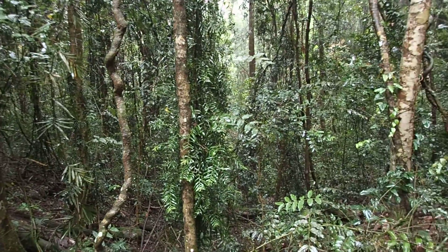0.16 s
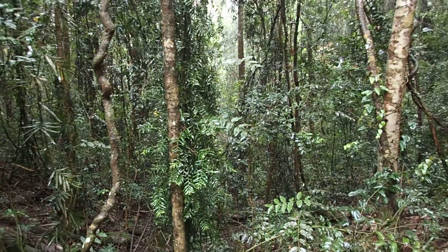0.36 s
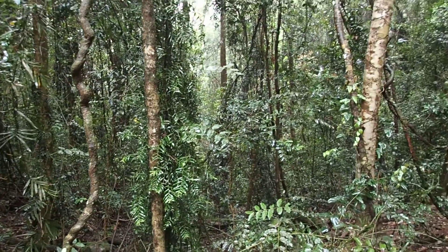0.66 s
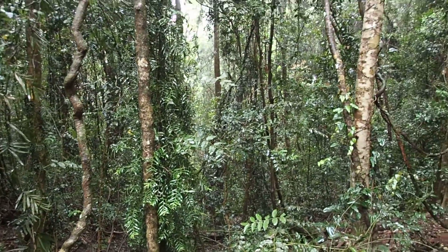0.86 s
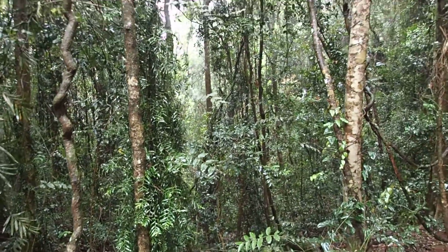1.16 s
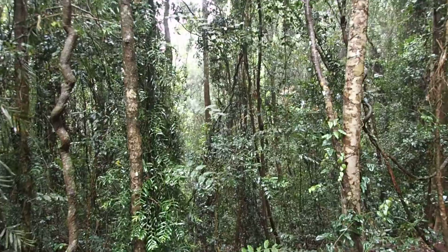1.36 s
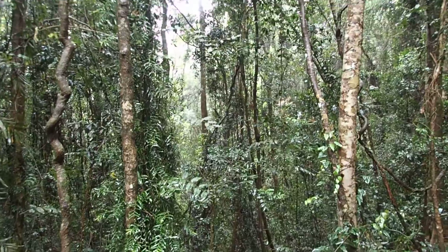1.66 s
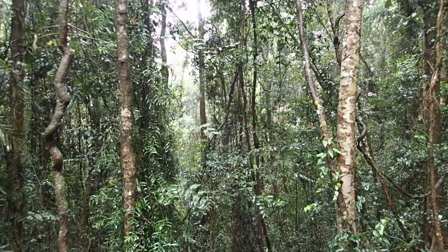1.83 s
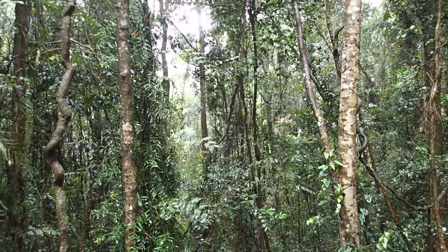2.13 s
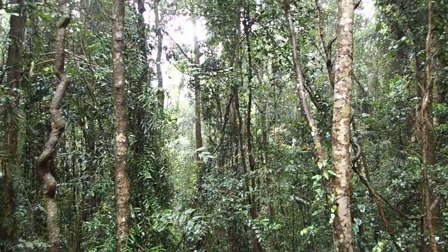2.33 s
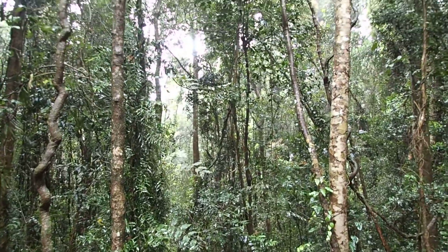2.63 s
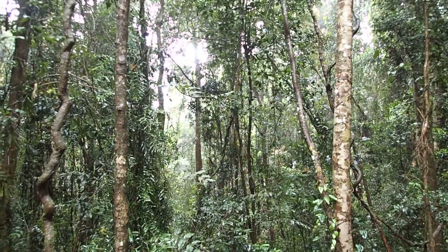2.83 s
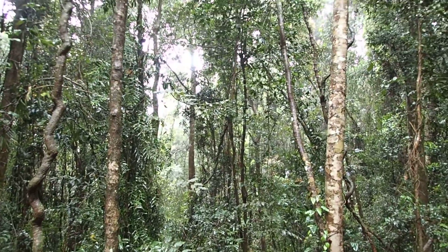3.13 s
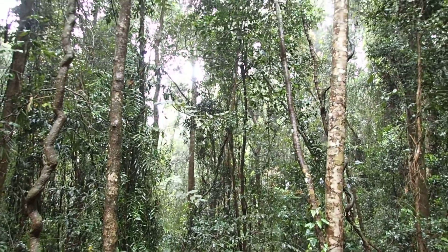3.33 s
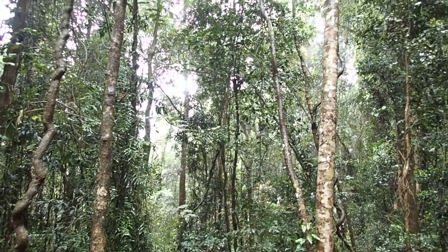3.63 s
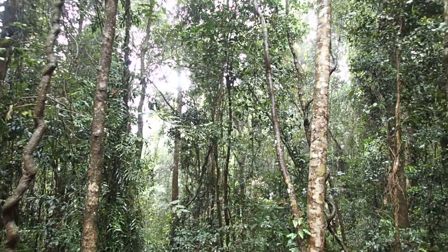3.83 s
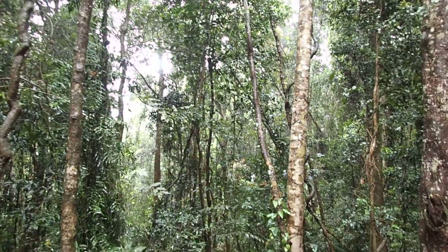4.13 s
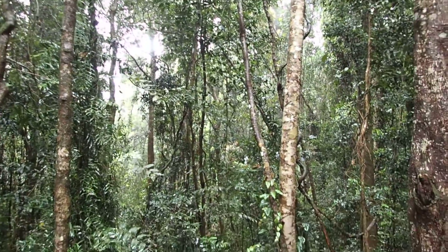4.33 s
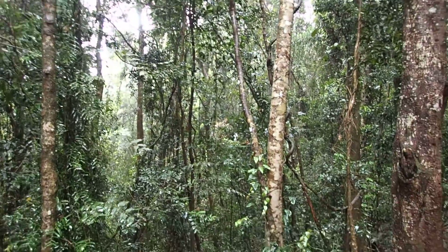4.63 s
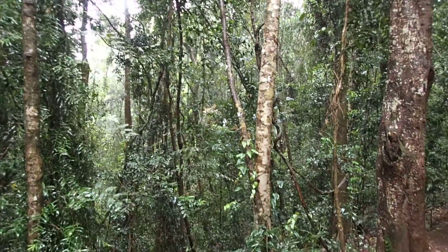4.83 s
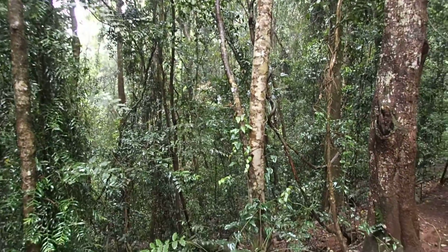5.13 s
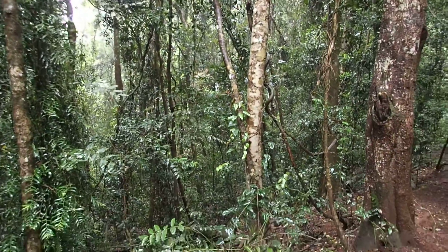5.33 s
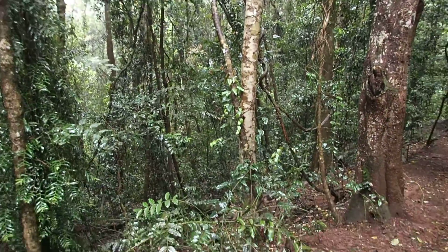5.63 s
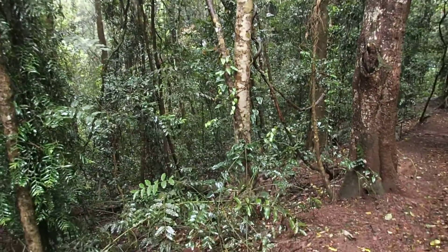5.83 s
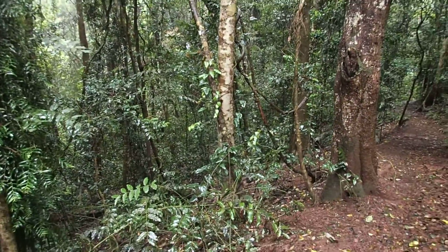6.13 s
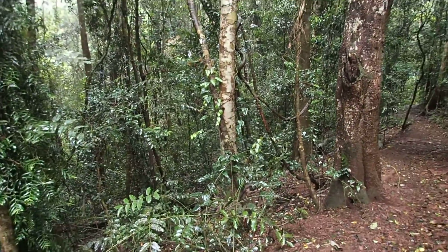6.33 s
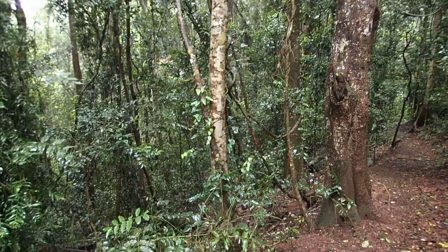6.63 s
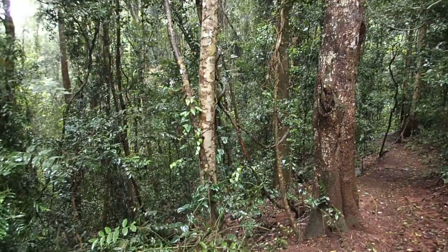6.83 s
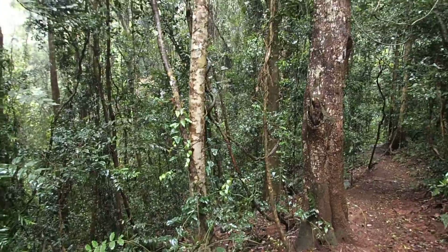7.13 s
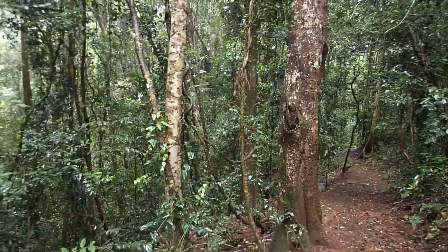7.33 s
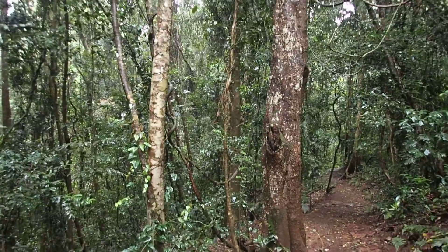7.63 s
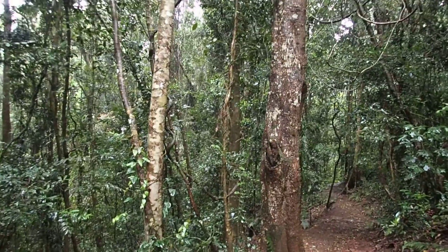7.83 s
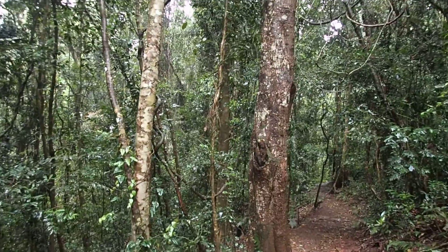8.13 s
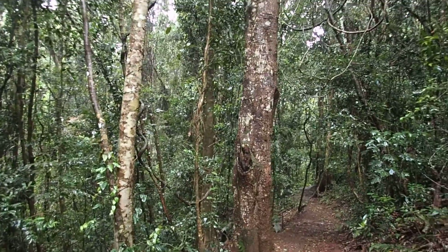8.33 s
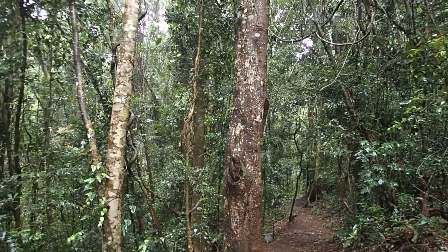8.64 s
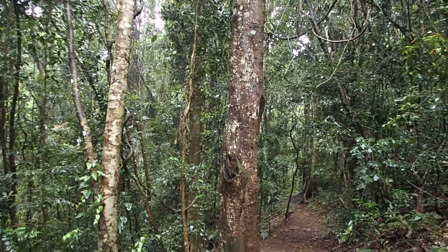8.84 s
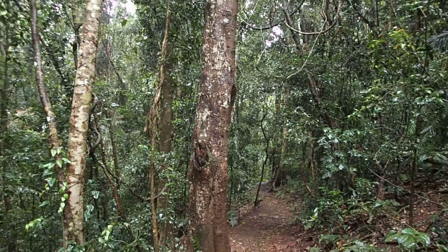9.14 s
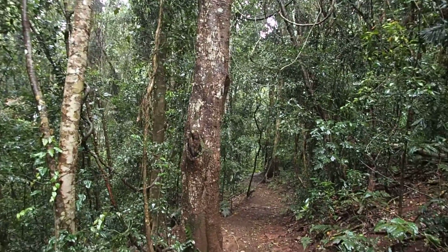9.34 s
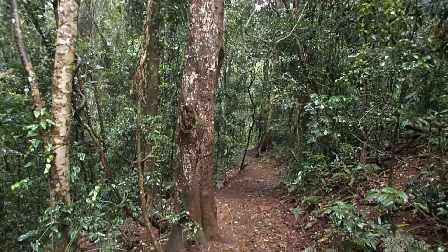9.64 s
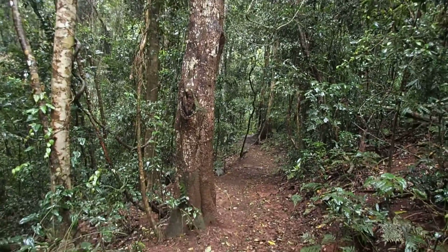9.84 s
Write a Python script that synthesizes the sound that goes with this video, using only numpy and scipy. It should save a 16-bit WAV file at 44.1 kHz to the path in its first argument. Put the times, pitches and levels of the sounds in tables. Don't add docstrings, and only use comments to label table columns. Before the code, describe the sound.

In a dripping rainforest a bird twice warbles into a held whistle and cracks like a whip, while another bird shrills far off between.

```python
import sys
import numpy as np
from scipy import signal
from scipy.fft import rfft, irfft, next_fast_len
from scipy.io import wavfile
from scipy.ndimage import uniform_filter1d

SR = 44100
rng = np.random.default_rng(int(sys.argv[2]) if len(sys.argv) > 2 else 0)


def store_wav(level_fs):
    pcm = np.round(np.clip(np.atleast_2d(level_fs), -1, 1) * 32767)
    wavfile.write(sys.argv[1], SR, pcm.T.astype(np.int16))


def field_ratio(decibels):
    return 10 ** (np.asarray(decibels, dtype=float) / 20)


N = 439677

# frequency in Hz, density in dB, likeness of left and right 0-1.
AIR_SPECTRUM = [(20, -8.5, 1), (46.4, -0.5, 0.7), (149, 0.5, 0.58), (300, -2.5, 0.52), (350, -4, 0.41),
                (1600, -9.5, 0.62), (2300, -15.5, 0.92), (4350, -15, 0.88), (5890, -10, 0.55),
                (9160, -18.5, 0.08), (15200, -22.5, 0)]
AIR_DB = -53.5

# start in seconds, peak in dB, ring in Hz,
# left minus right in dB, splash in Hz.
THUDS = [(0.174, -42, 503, -1, 1670), (0.664, -48, 690, 2, 1010), (0.782, -56, 544, 0.5, 1240),
         (1.775, -35, 630, 4, 1020), (3.967, -35, 686, 0, 1390), (4.008, -48, 790, 7, 2940),
         (4.191, -44.5, 1010, 10, 2970), (4.201, -44, 653, -5, 1505), (4.456, -40, 900, 9, 3540),
         (4.831, -52, 420, 1.5, 1374), (4.948, -36, 587, 2.0, 1260), (6.274, -59, 431, -5, 1400),
         (6.316, -47, 650, 1, 1660), (6.326, -44, 506, 4, 1040), (6.46, -53, 427, -4, 3120),
         (6.81, -34, 700, 1, 1140), (6.973, -34, 770, 1, 2095), (7.734, -57, 799, -4, 1220),
         (8.067, -39, 834, 4, 2140), (9.499, -49, 770, 8, 1110)]
# start in seconds, peak in dB, pitch in Hz, left minus right in dB.
TICKS = [(0.282, -40, 8100, 4.5), (0.3242, -39, 6390, 2.0), (0.5481, -42, 7200, 2.5), (1.41, -41, 6600, 6),
         (2.0443, -39, 7350, 1.5), (2.8403, -40, 6400, 2.0), (4.0096, -30.5, 7800, 6),
         (4.1923, -34, 7350, 1.5), (4.4841, -29, 7100, 1.5), (5.0175, -44, 7750, 1.5),
         (5.9853, -39, 7240, 14), (7.1071, -40, 8300, 0), (7.2633, -48, 6345, -1), (7.4435, -42, 8060, 7),
         (7.8365, -74, 8160, -29), (7.9956, -48, 8230, -20), (8.4255, -43, 7860, 2.0)]
# start in seconds, peak in dB, pitch in Hz, left minus right in dB.
ODD_DROPS = [
    (5.3028, -33, 15000, 15),
    (5.86, -38, 360, 1),
    (3.37, -42, 680, 1),
    (0.77, -39, 5500, 4),
    (6.4, -42, 3900, 1.5),
    (6.3165, -37, 2830, 2),
    (5.9, -38, 3130, -2),
]
EVEN_SPLASH_DB, SPLASH_DB_PER_DB = -41.5, 0.77

# start in seconds, fall level in dB, rise level in dB.
SONG = [(2.84, -71, -52.5), (3.047, -46, -47.5), (3.265, -44.5, -46.5), (3.483, -44, -43.5),
        (3.70, -44, -50), (3.922, -44, -46), (4.143, -44.5, -48.5), (4.368, -44.5, -47.5), (4.6, -44, -48),
        (4.834, -42.5, -50), (5.059, -43.5, -47.5), (5.297, -44, -47), (5.535, -45, -48), (5.765, -43, -47),
        (5.995, -45.5, -47.5), (6.223, -46, -48.5), (6.46, -46.5, -48.5), (6.693, -45, -50),
        (6.926, -45, -49.5), (7.165, -45.5, -51.5)]
# time in seconds, share of the way from start to end pitch, level in dB.
FALL = [(-.014, 0, -17.5), (0, 0.25, -13.5), (0.007, 0.454, -8), (0.026, 0.743, -5.5), (.045, .95, -9.5),
        (0.054, 1.012, -16)]
# time in seconds, share of the way from start to end pitch, level in dB.
RISE = [(-.008, 0.16, -11.5), (.008, .42, -5), (.02, .8, 0), (.034, 1, -1.5), (.07, 0.91, -11)]
FALL_FROM_HZ, RISE_FROM_HZ = 7600, 4820
TIRES_S, RISE_AFTER_S, BOTTOM_HZ, TOP_NOTE_HZ = 1.5, (.111, .141), (4946, 4500), (6050, 5647)
PITCH_SCATTER = 0.0066
FAR_LEVEL_DB = -10.5
# time in seconds, pitch in Hz, level in dB.
STRAY_NOTE = [(5.2, 2960, -75), (5.23, 3280, -75), (5.27, 3490, -75)]

# start in seconds, level in dB, width of slur (1 = full).
WARBLES = [(2.537, -60, 0.86), (2.642, -53, 1.05), (2.739, -51.5, 1), (2.835, -50, 1.05),
           (2.935, -49.5, 0.77), (7.8, -63, 0.5), (7.982, -60, 0.8), (8.078, -51.5, 0.62),
           (8.173, -48, 0.36), (8.267, -45.5, 0.06), (8.344, -44, 0)]
SLUR_S, SLUR_HZ, SLUR_UNDER_HZ, SLUR_LIFT_HZ, SLUR_OVER_HZ = 0.0543, 2320, 170, 90, 300
# start in seconds, length in seconds, first pitch in Hz,
# last pitch in Hz, level in dB.
HELD = [
    (3.035, 0.029, 2280, 2302, -48),
    (3.091, 0.054, 2310, 2340, -53),
    (3.164, 0.068, 2300, 2290, -45),
    (3.245, .07, 2298, 2280, -56.5),
    (8.44, 0.034, 2320, 2305, -44),
    (8.494, 0.027, 2300, 2330, -45.5),
    (8.528, 0.047, 2285, 2191, -41),
    (8.577, .03, 2220, 2240, -53),
    (8.607, 0.049, 2310, 2190, -53),
]
SWELL_PEAK, SWELL_START_DB, SWELL_END_DB = 0.61, -7.5, -5.5
# start in seconds, length in seconds, settled pitch in Hz,
# sag in Hz per second, level in dB.
DIPS = [
    (3.316, 0.162, 1540, 424, -48),
    (8.672, .15, 1550, 29.8, -47),
]
DIP_FROM_HZ, DIP_SETTLE_S, DIP_GLIDE_DB, DIP_FULL_S = 2020, .022, -5, 0.1
# time from its start in seconds, pitch in Hz, level in dB.
WHIP = [
    (0, 1778, -50),
    (0.021, 1778, -52),
    (.032, 2087, -46),
    (.052, 3057, -41),
    (0.073, 4270, -42),
    (.093, 6000, -36.5),
    (.105, 7000, -35.5),
    (.115, 7230, -49),
    (.131, 7380, -37),
]
# start in seconds, time stretch, level in dB, pitch of the foot in Hz.
CRACKS = [
    (3.56, 1.0, 4, 1775),
    (8.903, 1.003, 2.5, 1722),
]
WHIP_OVERTONES_DB, WHISTLE_OVERTONES_DB = (-34, -30), (-33,)
THIRD_FADES_HZ = 4400
DIP_ECHO_DB, LOW_ECHO_DB = -7, -16

# frequency in Hz, width in Hz, gain in dB.
BODY = [(1884, 83, -13), (2200, 250, 2), (2640, 430, -6), (3143, 340, 5), (3426, 286, -10.5),
        (3526, 290, 6.5), (4090, 496, -14.5), (4310, 620, 5), (4818, 66, -20), (5082, 1265, 13.5),
        (8020, 1130, 8)]
HISS_DB = -61
NARROW_LOW_HZ, NARROW_HIGH_HZ, NARROW_SIDE_DB = 2140, 4430, -6


def add(out, s, x):
    i = int(s * SR)
    out[..., i:i + x.shape[-1]] += x[..., :max(N - i, 0)]


def walk(rate_hz):
    k = int(SR / rate_hz)
    steps = np.repeat(rng.standard_normal(N // k + 1), k)
    return 1.3 * uniform_filter1d(uniform_filter1d(steps, k), k)[:N]


def panned(x, pan_db):
    return x * field_ratio(np.array([[pan_db], [-pan_db]]) / 2)


def stereo_noise(mid, side, like):
    return np.sqrt(1 + like) * mid + np.sqrt(1 - like) * side * np.array([[1], [-1]])


def air():
    size = next_fast_len(N)
    hz = np.maximum(np.fft.rfftfreq(size, 1 / SR), 1)
    points_hz, db, like = np.transpose(AIR_SPECTRUM)
    db = np.interp(np.log(hz), np.log(points_hz), db)
    like = np.interp(np.log(hz), np.log(points_hz), np.clip(like, 0, 1))
    mid, side = rfft(rng.standard_normal((2, size)))
    spectrum = field_ratio(db) * stereo_noise(mid, side, like)
    out, swell = 0, walk(0.89)
    for octave in range(5, 16, 2):
        share = np.clip(1 - np.abs(np.log2(hz) - octave) / 2, 0, 1)
        band = irfft(spectrum * share, size)[:, :N]
        out = out + band * field_ratio(.4 * swell + .9 * walk(8))
    return out * field_ratio(AIR_DB) / np.sqrt(np.mean(out ** 2))


def strike_leaf(out, s, db, hz, pan_db, cycles, splash_db, splash_s, splash_hz):
    t = np.arange(700) / SR
    ring = np.sin(2 * np.pi * hz * t) * np.exp(-t * hz / cycles) * (1 - np.exp(-t * hz * 3))
    spray = uniform_filter1d(rng.standard_normal(len(t)), size=int(SR / splash_hz))
    spray = spray * np.sqrt(SR / splash_hz)
    splash = spray * np.cos(2 * np.pi * splash_hz * t) * np.exp(-t / splash_s)
    add(out, s, panned(field_ratio(db) * (ring + field_ratio(splash_db) * splash)[None], pan_db))


def drips(patter_count=400):
    out = np.zeros((2, N))
    for s, db, hz, pan_db, splash_hz in THUDS:
        strike_leaf(out, s, db - 4, hz, pan_db, cycles=1.3,
                    splash_db=SPLASH_DB_PER_DB * (EVEN_SPLASH_DB - db), splash_s=0.0059, splash_hz=splash_hz)
    for s, db, hz, pan_db in TICKS + ODD_DROPS:
        strike_leaf(out, s, db, hz, pan_db, cycles=2.7, splash_db=-12.5, splash_s=0.0014, splash_hz=hz)
    for when, faint, pitch, place in rng.random((patter_count, 4)):
        hz = 600 * 18 ** pitch
        strike_leaf(out, when * N / SR, -53 - 12 * faint ** .5, hz, 8 * (place - .5),
                    cycles=3.6, splash_db=3.5, splash_s=0.0026, splash_hz=hz)
    return out


def whistle(out, rows, overtones_db=(), edge_s=0.005):
    s, hz, db = np.transpose(sorted(rows))
    t = np.arange(s[0], s[-1], 1 / SR)
    path_hz = uniform_filter1d(np.interp(t, s, hz), size=200)
    phase = 2 * np.pi * np.cumsum(path_hz) / SR
    tone = np.sin(phase)
    for k, overtone_db in enumerate(overtones_db):
        fade = 1 + k * (path_hz / THIRD_FADES_HZ) ** 10
        tone = tone + field_ratio(overtone_db) * np.sin((k + 2) * phase) / fade
    ends = np.clip(np.minimum(t - s[0], s[-1] - t) / edge_s, 0, 1)
    add(out, s[0], np.sqrt(2) * tone * field_ratio(np.interp(t, s, db)) * np.sin(ends * np.pi / 2) ** 2)


def forest(x, pan_db, wet_db, low_db, cross_hz, t60_low_s, t60_high_s, likeness, early_db, spikes_db,
           turns, build_s):
    t = np.arange(int(1.1 * SR)) / SR
    like = np.clip(likeness, 0, 1)
    low_pass = signal.butter(4, cross_hz, fs=SR, output="sos")
    high_pass = signal.butter(4, cross_hz, "high", fs=SR, output="sos")
    out, facing = np.array([x, x]), turns * walk(5)
    for share in (np.cos(facing), np.sin(facing)):
        mid, side, size = rng.standard_normal((3, len(t)))
        early = 1 + field_ratio(early_db) * np.exp(-t / 0.0079)
        trunks = field_ratio(spikes_db * size) * early * np.clip(t / build_s, 0, 1)
        echoes = trunks * stereo_noise(mid, side, like)
        low = field_ratio(low_db) * signal.sosfilt(low_pass, echoes) * field_ratio(-60 * t / t60_low_s)
        high = signal.sosfilt(high_pass, echoes) * field_ratio(-60 * t / t60_high_s)
        tail = low + high
        response = field_ratio(wet_db) * tail / np.sqrt(np.mean(np.sum(tail ** 2, axis=1)))
        out = out + signal.fftconvolve((share * x)[None], response, axes=1)[:, :N]
    return panned(out, pan_db)


def far_bird():
    voice = np.zeros(N)
    scatters = 1 + PITCH_SCATTER * rng.standard_normal((len(SONG), 2))
    for (start, fall_db, rise_db), scatter in zip(SONG, scatters):
        tired = 1 - np.exp(-(start - SONG[0][0]) / TIRES_S)
        after_s, bottom_hz, top_hz = (fresh + tired * (worn - fresh)
                                      for fresh, worn in (RISE_AFTER_S, BOTTOM_HZ, TOP_NOTE_HZ))
        fall_span_hz = bottom_hz * scatter[0] - FALL_FROM_HZ
        rise_span_hz = top_hz * scatter[1] - RISE_FROM_HZ
        whistle(voice, [(start + s, FALL_FROM_HZ + way * fall_span_hz, db + fall_db + FAR_LEVEL_DB)
                        for s, way, db in FALL])
        whistle(voice, [(start + after_s + s, RISE_FROM_HZ + way * rise_span_hz, db + rise_db + FAR_LEVEL_DB)
                        for s, way, db in RISE])
    whistle(voice, STRAY_NOTE)
    return forest(voice, pan_db=1.0, wet_db=13, low_db=1.5, cross_hz=6000, t60_low_s=1.33, t60_high_s=1.0,
                  likeness=0.84, early_db=5.0, spikes_db=5.5, turns=2.24, build_s=.008)


def warbles(out):
    for s, db, wide in WARBLES:
        low_hz = SLUR_HZ - wide * SLUR_UNDER_HZ
        best_hz = SLUR_HZ + wide * SLUR_LIFT_HZ
        top_hz = SLUR_HZ + np.sqrt(max(wide, 0)) * SLUR_OVER_HZ
        whistle(out, [(s, low_hz, db - 6.5), (s + 0.352 * SLUR_S, best_hz, db),
                      (s + 0.61 * SLUR_S, top_hz, db - 9.5), (s + SLUR_S, SLUR_HZ, db - 19)])


def held_whistle(out):
    for s, length, first_hz, last_hz, db in HELD:
        peak_hz = first_hz + SWELL_PEAK * (last_hz - first_hz)
        whistle(out, [(s, first_hz, db + SWELL_START_DB), (s + SWELL_PEAK * length, peak_hz, db),
                      (s + length, last_hz, db + SWELL_END_DB)], WHISTLE_OVERTONES_DB, edge_s=0.0045)


def low_dips(out):
    for s, length, settled_hz, sag, db in DIPS:
        t = np.linspace(0, length, num=24)
        hz = settled_hz - sag * t + (DIP_FROM_HZ - settled_hz) * np.exp(-t / DIP_SETTLE_S)
        level_db = db + DIP_GLIDE_DB * np.clip(1 - t / DIP_FULL_S, 0, 1)
        whistle(out, zip(s + t, hz, level_db), WHISTLE_OVERTONES_DB, edge_s=0.0071)


def whips(out):
    for start, stretch, whip_db, foot_hz in CRACKS:
        shift_hz = WHIP[0][1] - foot_hz
        whistle(out, [(start + stretch * s, hz - shift_hz * WHIP[0][1] / hz, db + whip_db)
                      for s, hz, db in WHIP], WHIP_OVERTONES_DB)


def whipbird():
    soft, loud, low_notes = np.zeros((3, N))
    warbles(soft)
    held_whistle(soft)
    low_dips(low_notes)
    whips(loud)
    to_trunks = field_ratio(DIP_ECHO_DB)
    direct_dips = panned((1 - to_trunks) * low_notes[None], 1.3)
    sung = forest(soft + to_trunks * low_notes, pan_db=2.0, wet_db=2.5, low_db=LOW_ECHO_DB, cross_hz=1870,
                  t60_low_s=0.86, t60_high_s=1.1, likeness=1.0, early_db=8.5, spikes_db=5, turns=0.35,
                  build_s=0.0069)
    cracked = forest(loud, pan_db=1.0, wet_db=4, low_db=LOW_ECHO_DB, cross_hz=2300,
                     t60_low_s=0.99, t60_high_s=0.83, likeness=0.82, early_db=7.5, spikes_db=8.5, turns=0.67,
                     build_s=0.0028)
    return direct_dips + sung + cracked


def scene():
    return air() + drips() + far_bird() + whipbird()


def causal(db, count):
    cep = irfft(db * np.log(10) / 20)
    half = len(cep) // 2
    cep[1:half] *= 2
    cep[half + 1:] = 0
    return irfft(np.exp(rfft(cep)))[:count]


def microphone(dry):
    hz = np.fft.rfftfreq(8192, 1 / SR)
    colour_db = sum(db / (1 + (2 * (hz - f) / width) ** 2) for f, width, db in BODY)
    tilt_db = 0.32 + 1.85 * np.clip(hz / 4400, 0, 1) + 1.6 / (1 + (hz / 60) ** 2)
    ports = np.array([causal(colour_db + sign * tilt_db / 2, count=4096) for sign in (1, -1)])
    heard = signal.oaconvolve(dry, ports, axes=1)[:, :N]
    heard = heard + panned(field_ratio(HISS_DB) * rng.standard_normal((2, N)), 0.72)
    side = (heard[0] - heard[1]) / 2
    band_pass = signal.butter(4, (NARROW_LOW_HZ, NARROW_HIGH_HZ), "band", fs=SR, output="sos")
    band = signal.sosfiltfilt(band_pass, side)
    return heard - (1 - field_ratio(NARROW_SIDE_DB)) * band * np.array([[1], [-1]])


def band_limit(x):
    return signal.sosfilt(signal.butter(12, 15784, fs=SR, output="sos"), x)


def record(dry):
    heard = microphone(dry)
    return band_limit(heard)


dry = scene()
out = record(dry)
store_wav(out)
```